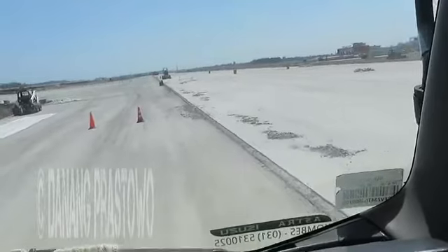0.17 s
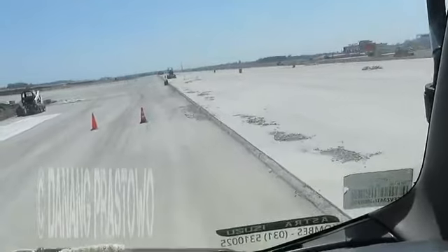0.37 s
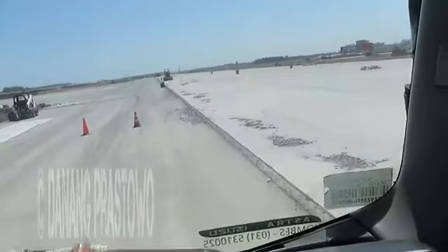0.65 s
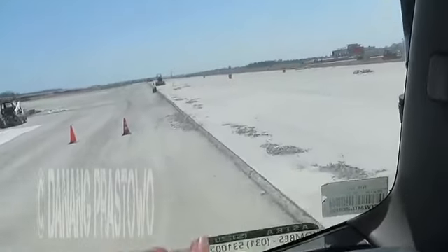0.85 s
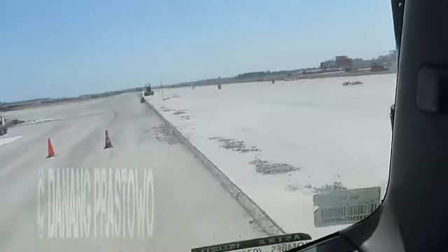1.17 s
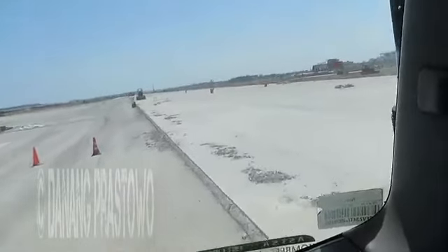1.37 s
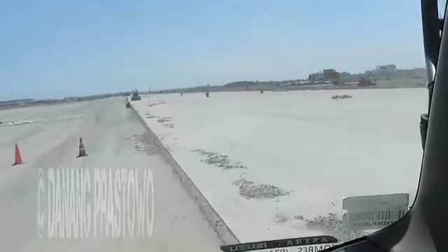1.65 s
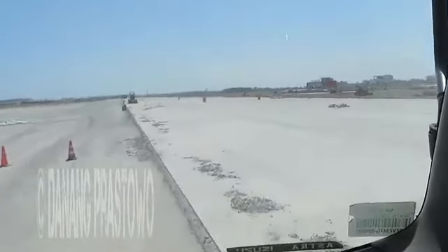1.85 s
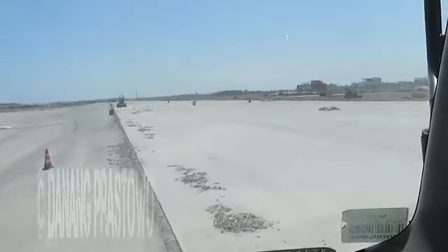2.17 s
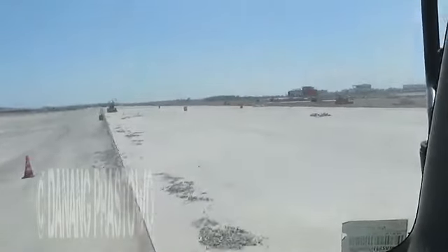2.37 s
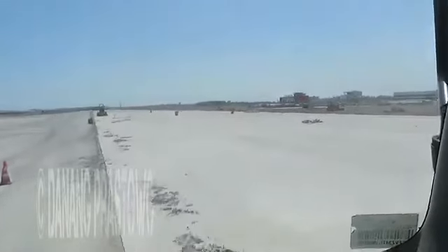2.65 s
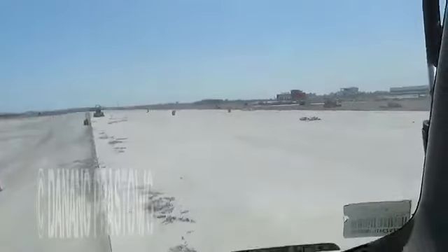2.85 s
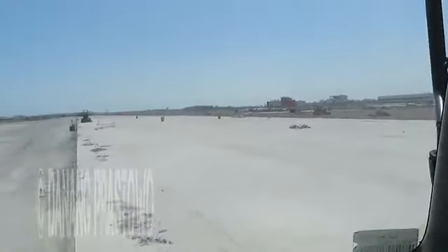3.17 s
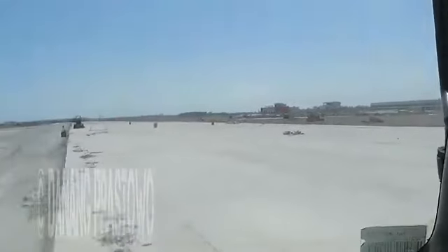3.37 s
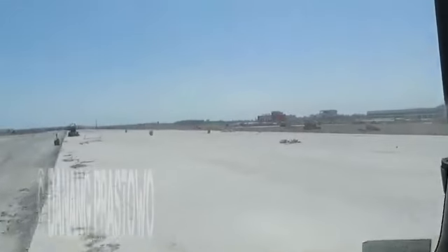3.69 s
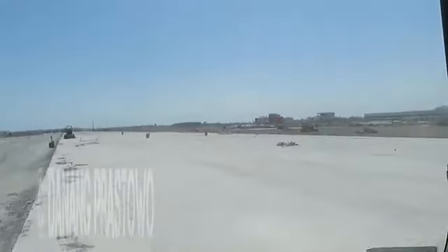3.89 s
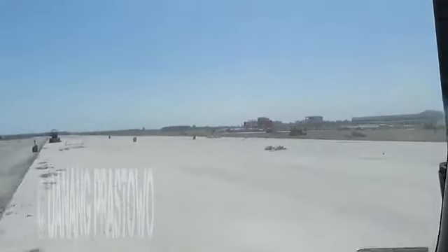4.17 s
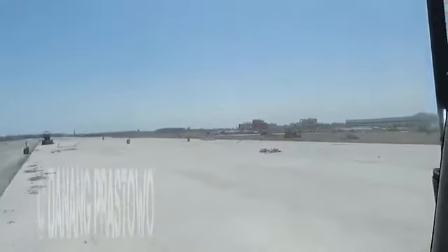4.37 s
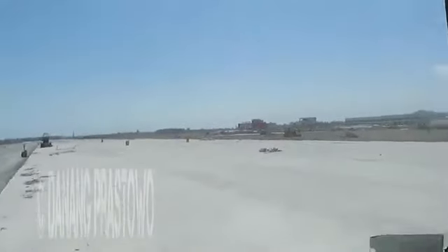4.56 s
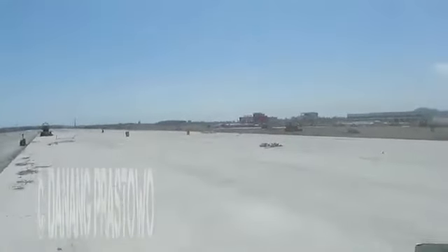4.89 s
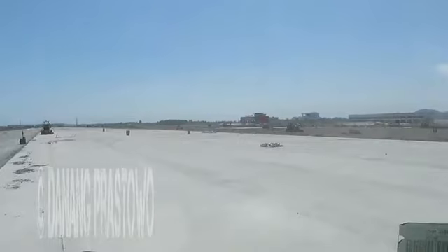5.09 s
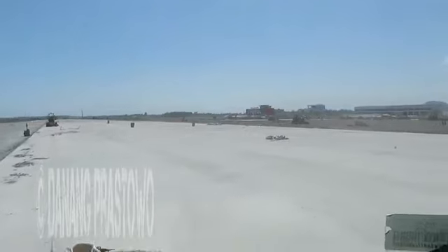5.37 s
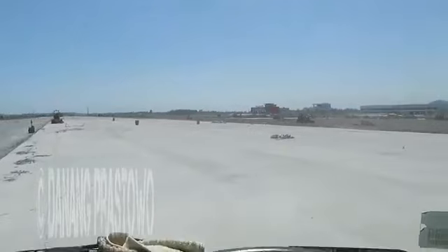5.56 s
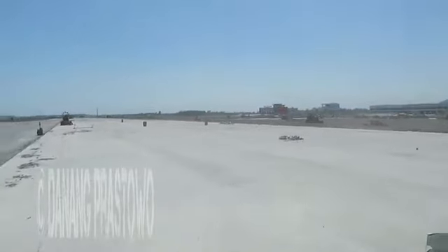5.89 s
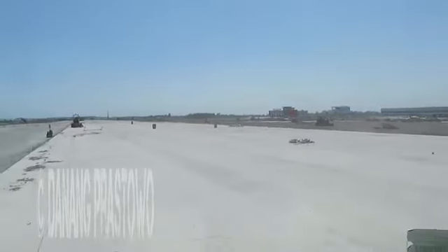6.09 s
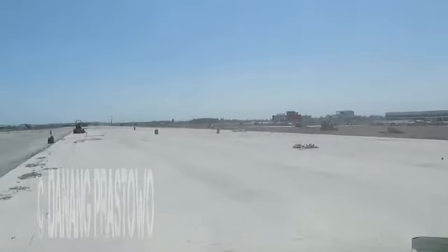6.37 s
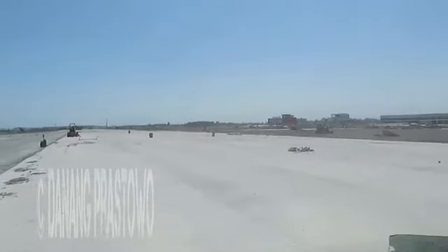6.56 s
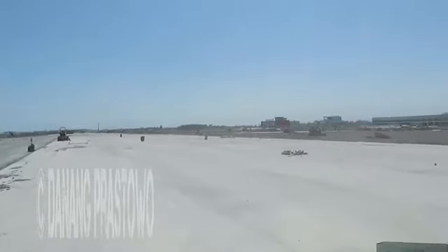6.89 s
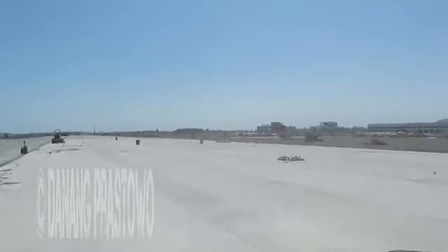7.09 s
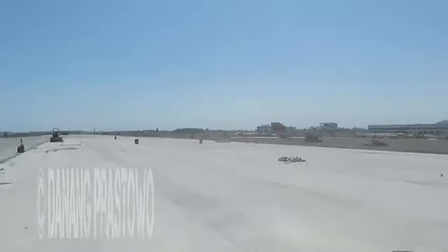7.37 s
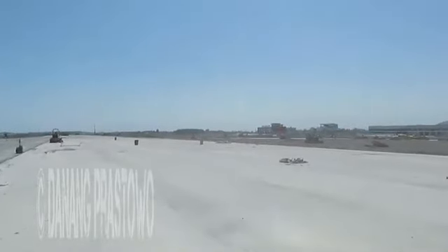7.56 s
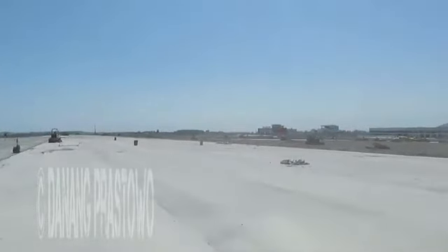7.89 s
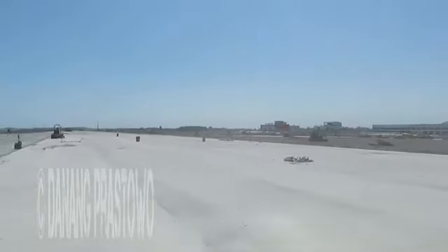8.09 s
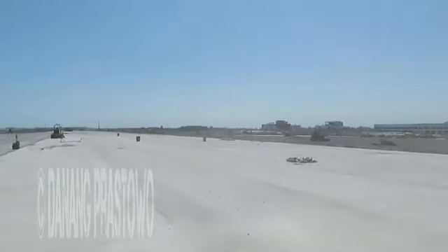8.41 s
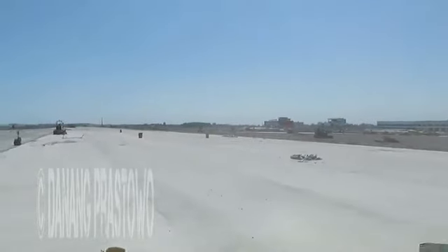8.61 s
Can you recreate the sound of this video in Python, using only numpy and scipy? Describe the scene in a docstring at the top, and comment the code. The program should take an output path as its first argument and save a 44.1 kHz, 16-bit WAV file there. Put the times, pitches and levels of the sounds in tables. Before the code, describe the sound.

Inside a heavy diesel truck cab crossing rough open ground: a deep engine boom with droning fan tones and dull road rumble. The engine slowly sags, then revs back up. Bumps thud in clusters around three, five and six to seven seconds, with sharp trim rattles and a tiny metal squeak. A handheld microphone in the cab thins the bass abruptly at times.

```python
"""Truck cab on rough ground

Inside the cab of a six-cylinder diesel truck: firing booms as summed orders, fan tones and shaft throb
follow the engine speed, and filtered noise gives rumble, cab drone, clatter and block knock.
Bumps drum floor panels and stir the clatter; taps ring loose trim modes and a small metal part squeaks.
A microphone wind filter thins the bass in sudden steps; the low mids are nearer mono meanwhile."""
import sys
import numpy as np
from scipy import signal
from scipy.fft import rfft, irfft, next_fast_len
from scipy.io import wavfile
from scipy.ndimage import uniform_filter1d

SR = 44100
rng = np.random.default_rng(int(sys.argv[2]) if len(sys.argv) > 2 else 0)


def output_pcm(signal):
    """Save a mono or channel-first signal as 16-bit PCM at the path in sys.argv[1].

    Samples are clipped to [-1, 1] before scaling.
    """
    pcm = np.clip(np.atleast_2d(signal).T, -1, 1) * 32767
    wavfile.write(sys.argv[1], SR, np.round(pcm).astype(np.int16))


N = 385434

# road rumble through the floor: (frequency [Hz], relative gain [dB])
RUMBLE_SPECTRUM = [(15, -21), (32, -8), (45, 3), (70, 1), (95, 4), (150, 3.5), (260, -1.5), (335, 1.5),
                   (400, 1.5), (470, -1), (560, -12), (700, -15), (1000, -56.5)]
# treble unshared by the two channels: (frequency [Hz], side to mid [dB])
TREBLE_SPREAD = [(900, -60.5), (1850, -16.5), (3270, -8.5), (5800, -5), (10200, -6)]


def from_db(db):
    """Amplitude ratio of a level in dB."""
    return 10 ** (np.asarray(db) / 20)


def rms_one(x):
    """Scales a signal to an rms of 1."""
    return x / np.sqrt(np.mean(x ** 2) + 1e-20)


def in_time(rows):
    """Interpolates each column of a (time, ...) table to every sample."""
    time_s, *columns = np.transpose(rows)
    return [np.interp(np.arange(N) / SR, time_s, column) for column in columns]


def drift(corner_hz):
    """Slow random signal of rms 1: noise through two equal poles, at a fortieth of the sample rate."""
    r = np.exp(-2 * np.pi * corner_hz * 40 / SR)
    noise = rng.standard_normal(N // 40 + 2002)
    slow = signal.lfilter([1], [1, -2 * r, r * r], noise)[2000:]   # settled part
    return np.interp(np.arange(N) / 40, np.arange(len(slow)), rms_one(slow))


def coloured(x, spectrum):
    """Applies a (frequency [Hz], gain [dB]) table, interpolated over log frequency."""
    size = next_fast_len(N)
    hz, db = np.transpose(spectrum)
    grid_hz = np.maximum(np.arange(size // 2 + 1) * SR / size, 1)
    gain = from_db(np.interp(np.log(grid_hz), np.log(hz), db))
    return irfft(rfft(x, size) * gain, size)[:N]


def ring(drive, hz, t60_s):
    """Two-pole resonator: a unit click starts a decaying sine of height 1."""
    r, w = from_db(-60 / (t60_s * SR)), 2 * np.pi * hz / SR
    return signal.lfilter([0, np.sin(w)], [1, -2 * r * np.cos(w), r * r], drive)


def add(out, start_s, sound):
    """Mixes a sound into out from its start time."""
    at = round(start_s * SR)
    out[at:at + len(sound)] += sound[:N - at]


def engine_turns():
    """Running count of firings: the tabled speed, wavering as the wheels roll over uneven ground."""
    # engine speed sags, then picks up: (time [s], firing rate before wobble [1/s])
    firing_rate = [(0.0, 54.1), (1.2, 52.9), (2.0, 51.7), (2.8, 50.3), (3.2, 49.0), (4.0, 47.8),
                   (4.8, 47.7), (5.2, 46.2), (6.0, 47.8), (6.8, 51.9), (7.2, 52.7), (8.0, 53.4),
                   (8.3, 54.3), (8.74, 55.2)]
    wobble_rms_hz, wobble_corner_hz = .22, 3.0
    rate_hz = in_time(firing_rate)[0] + wobble_rms_hz * drift(wobble_corner_hz)
    return np.cumsum(rate_hz) / SR


def engine(turns):
    """Each firing is a sharp suck of pressure: orders in step, the higher ones wavering more."""
    # (multiple of the firing rate, level to the boom [dB])
    firing_orders = [(1, 1), (2, -10.5), (3, -15.5), (4, -23)]
    # (time [s], boom level [dB], extra in the second order [dB])
    boom = [(0, -31.5, 5), (.25, -23, 3), (1.4, -23, 4.5), (1.9, -24, 2), (2.5, -25.5, -23),
            (2.85, -22.5, -2), (3.6, -23, 2), (4.2, -23, 6), (4.8, -23.5, 5.5), (5.1, -19.5, -1),
            (5.8, -21, 4), (6.4, -19, -4.5), (6.75, -23, -3.5), (7.05, -20.5, 6), (7.8, -21.5, 1),
            (8.1, -18, -1), (8.55, -18, 2.5), (8.74, -19, 3.5)]
    boom_db, second_db = in_time(boom)
    out = 0
    for k, db in firing_orders:
        waver_db, wander_rad = .6 * k * drift(5), .07 * k * drift(3.5)
        order_db = db + second_db * (k == 2) + waver_db
        out = out - from_db(order_db) * np.cos(2 * np.pi * k * turns + wander_rad)
    return np.sqrt(2) * from_db(boom_db) * out


def fan(turns):
    """Unevenly spaced blades of the belt-driven fan give unsteady tones on multiples of its speed."""
    fan_turns = .448 * turns   # fan turns per firing
    # (multiple of fan speed, level [dB])
    fan_orders = [(5, -39), (6, -43), (7, -33), (8, -42), (10, -37), (12, -42), (14, -38.5), (16, -40),
                  (18, -44)]
    # (time [s], gain of all fan tones [dB])
    fan_gain = [(0, 1), (2, 0.5), (3.2, 0.5), (4.5, 0), (5.5, -2.5), (7, -0.5), (8, -3.5), (8.74, -5)]
    # cab resonances lift a tone sliding onto them: (frequency [Hz], gain [dB])
    cab_response = [(105, -10), (120, 3), (128, -5), (143, 0), (158, -0.5), (170, -4), (210, -11),
                    (228, -2), (243, 3.5), (295, -11), (322, 2.5), (340, -1.5), (372, 2), (390, -5.5)]
    fan_hz = np.gradient(fan_turns) * SR
    tones = 0
    for k, db in fan_orders:
        lift_db = np.interp(k * fan_hz, *np.transpose(cab_response))
        unsteady_db, wander_rad = 2.5 * drift(1.5), .05 * k * drift(2)
        tone = np.sin(2 * np.pi * k * fan_turns + wander_rad)
        tones = tones + from_db(db + lift_db + unsteady_db) * tone
    return np.sqrt(2) * from_db(in_time(fan_gain)[0]) * tones


def shake(turns, shaft_db, rocking_db):
    """An unbalanced driveline shaft throbs below the firing; the road rocks the cab on its mounts."""
    shaft_ratio = .705   # shaft turns per firing
    mount_hz, mount_width_hz = 28.1, 21   # width of each of two resonator passes
    phase = 2 * np.pi * shaft_ratio * turns + .25 * drift(2.5)
    shaft = np.sqrt(2) * from_db(shaft_db + 1.5 * drift(3)) * np.sin(phase)
    r, w = np.exp(-np.pi * mount_width_hz / SR), 2 * np.pi * mount_hz / SR
    rocking = rng.standard_normal(N)
    for _ in range(2):
        rocking = signal.lfilter([1, 0, -1], [1, -2 * r * np.cos(w), r * r], rocking)
    return shaft + from_db(rocking_db) * rms_one(rocking)


def road_rumble(rumble_db):
    """Road noise through the floor: coloured noise with a slow and a faster random level."""
    uneven_db = 1.0 * drift(2.5) + 1.96 * drift(12.7)
    noise = from_db(uneven_db) * rng.standard_normal(N)
    return from_db(rumble_db) * rms_one(coloured(noise, RUMBLE_SPECTRUM))


def cab_drone(drone_db):
    """Noise rings an air mode of the cab, driven by the road, and a higher, steady one."""
    drone_hz, drone_t60_s = 160, 0.054
    hum_hz, hum_db, hum_t60_s = 327, -36, 0.1
    drone = rms_one(ring(rng.standard_normal(N), drone_hz, drone_t60_s))
    hum = rms_one(ring(rng.standard_normal(N), hum_hz, hum_t60_s))
    return from_db(drone_db) * drone + from_db(hum_db) * hum


def clatter(level):
    """Dense valve and combustion clatter and tyre hiss, flickering a little octave by octave."""
    # through the bulkhead: (frequency [Hz], relative gain [dB])
    hiss_spectrum = [(400, -1.5), (600, -4.5), (660, -4), (750, 2), (1100, 1.5), (1500, -4.5), (2000, -9.5),
                     (2800, -14), (3600, -19.5), (4300, -20.5), (5300, -26), (6200, -29), (7100, -32),
                     (7450, -30), (7800, -34), (8200, -31), (8500, -35), (10700, -44)]
    white = rng.standard_normal((2, 2, N))   # neighbouring bands get unrelated noise
    together = drift(3.2)
    edges_hz = 350 * 2. ** np.arange(7).clip(0, 5.8)
    bands = 0
    for k, (low_hz, high_hz) in enumerate(zip(edges_hz, edges_hz[1:])):
        flicker_db = .45 * together + .6 * drift(12)
        band_pass = signal.butter(2, [low_hz, high_hz], "band", fs=SR, output="sos")
        bands = bands + from_db(flicker_db) * signal.sosfilt(band_pass, white[k % 2])
    mid = coloured(bands[0], hiss_spectrum)
    side = coloured(coloured(bands[1], hiss_spectrum), TREBLE_SPREAD)
    return level * np.array([mid + side, mid - side]) / np.std(mid)


def knock(turns):
    """One knock per firing, its strength set by the cylinder, drawn out by the many modes of the block."""
    # the two halves of the block knock unequally: (level [dB]) per cylinder in firing order
    cylinder_db = [0, -7, -1, -6, 0, -8]
    # through the bulkhead: (frequency [Hz], relative gain [dB])
    knock_spectrum = [(500, -26), (700, -2.5), (1050, 1.5), (1350, -5), (2200, -21.5), (4000, -40)]
    scatter_db, t60_s = 1.5, .09
    firing = np.floor(turns).astype(int)
    strength = from_db(np.array(cylinder_db)[firing % 6] + scatter_db * rng.standard_normal(N))
    blows = (np.diff(firing, prepend=0) > 0) * strength
    t = np.arange(round(t60_s * SR)) / SR
    block = from_db(-60 * t / t60_s) * rng.standard_normal(len(t))
    return rms_one(coloured(signal.fftconvolve(blows, block)[:N], knock_spectrum))


def burst(length_s):
    """Envelope of a jolt: quick rise, slower fall."""
    t = np.arange(round(4 * length_s * SR)) / (length_s * SR)
    return (1 - np.exp(-6.0 * t)) * np.exp(-2.0 * t)


def bumps():
    """Each bump drums a floor panel; the longer, higher-pitched ones stir up more clatter."""
    # wheels over a bump: (time [s], level [dB], envelope scale [s], floor panel [Hz])
    bump_list = [(.27, -25.5, 0.029, 436), (1.462, -25, 0.022, 376), (1.645, -17.5, .025, 363),
                 (2.125, -19.5, 0.017, 368), (2.694, -15.5, .025, 345), (2.753, -21.5, 0.025, 398),
                 (2.765, -24, 0.02, 554), (2.882, -20, 0.056, 160), (2.93, -27.5, .03, 503),
                 (2.966, -16, 0.03, 498), (2.97, -26, .025, 596), (3.005, -19.5, 0.055, 454),
                 (3.025, -24.5, .03, 562), (3.032, -17.5, 0.034, 324), (3.055, -16, .014, 350),
                 (3.111, -21, 0.031, 435), (4.6, -25, 0.048, 200), (4.826, -11.5, 0.041, 180),
                 (4.88, -17.5, 0.046, 160), (4.956, -20, 0.053, 461.5), (4.97, -12, .04, 160),
                 (5.013, -15, 0.019, 480), (5.02, -27.5, 0.023, 608), (5.072, -21, 0.026, 360),
                 (5.093, -19, 0.017, 450), (5.111, -16, 0.022, 474), (5.16, -34, 0.017, 452),
                 (6.151, -21.5, 0.053, 482), (6.205, -23, .015, 805), (6.215, -16, 0.04, 470),
                 (6.612, -18, .02, 348), (6.698, -17.5, 0.028, 355), (6.887, -12, 0.018, 398),
                 (6.934, -21, 0.016, 408), (7.104, -15.5, 0.014, 387), (7.188, -15.5, .018, 397),
                 (7.269, -24.5, 0.016, 338), (7.642, -20.5, .02, 382), (7.863, -19, 0.017, 326),
                 (8.351, -24, 0.059, 412), (8.603, -18.5, 0.028, 310)]
    drum_rough = .3   # random share of each phase step
    stir_s, stir_db = 0.046, -22.5
    drum, stir = np.zeros(N), np.zeros(N)
    for start_s, db, length_s, hz in bump_list:
        shape = burst(length_s)
        rough = 1 + drum_rough * rng.standard_normal(len(shape))
        phase = np.cumsum(2 * np.pi * hz / SR * rough)
        add(drum, start_s, np.sqrt(2) * from_db(db) * shape * np.sin(phase))
        stir_gain = from_db(db) * length_s / stir_s * (hz / 480) ** 2
        add(stir, start_s, stir_gain * burst(stir_s))
    return drum, from_db(stir_db + 2.5 * drift(60)) * stir


def trim_taps():
    """A tap rings the trim's modes near its favoured pitch; a broad noise crack comes with it."""
    # (time [s], ringing level [dB], favoured pitch [Hz], crack level [dB]), before the trim gain
    taps = [(2.762, -28, 800, -37), (2.773, -34, 1300, -39), (2.838, -32, 930, -44), (2.863, -32, 750, -42),
            (2.932, -32, 2400, -40), (2.972, -28, 1300, -35), (2.98, -32, 2500, -39.5),
            (2.99, -28, 1110, -38), (3.0, -34, 900, -37), (3.024, -27.5, 1160, -37), (3.041, -26, 900, -33),
            (3.047, -28, 1500, -26.5), (3.056, -17.5, 790, -30), (3.0585, -32.5, 3200, -27),
            (3.0612, -21, 1700, -29.5), (3.064, -25.5, 1110, -29), (3.066, -18.5, 1440, -24.5),
            (3.074, -31, 1400, -27), (3.486, -28, 1000, -39), (4.604, -18, 894, -34.5),
            (4.905, -33, 2300, -40), (4.954, -29, 1400, -33), (4.958, -37, 3100, -33),
            (4.963, -29, 2500, -39), (4.969, -29, 1400, -36), (4.976, -28, 1400, -39),
            (4.985, -29, 1010, -42), (5.01, -22.5, 900, -41), (5.025, -32, 2300, -40),
            (5.035, -33, 1520, -37), (5.039, -39, 3100, -41), (5.065, -32, 1100, -44),
            (5.085, -35, 2100, -43), (5.098, -30.5, 1490, -39), (5.108, -36, 2700, -39),
            (5.112, -26.5, 700, -42), (5.12, -33, 1000, -45), (5.148, -29, 750, -44),
            (5.175, -30.5, 800, -45), (5.246, -30.5, 750, -43), (5.312, -31, 1400, -42),
            (5.349, -31, 2020, -28), (5.352, -21, 1330, -32), (5.3523, -38, 4100, -39),
            (5.3529, -20, 1920, -25), (5.356, -25, 800, -39), (5.3589, -21, 1400, -26),
            (5.359, -35, 6200, -35), (5.3603, -29, 2160, -31), (6.13, -46, 1460, -32),
            (6.154, -33, 1400, -41), (6.163, -38, 3100, -44), (6.175, -30, 1000, -43),
            (6.189, -30, 1400, -33), (6.194, -30, 1900, -30), (6.2, -23, 716, -30),
            (6.2005, -18.5, 1600, -20.5), (6.202, -24, 2200, -31), (6.2013, -30, 5570, -27),
            (6.209, -25, 754, -31), (7.495, -24, 1140, -31)]
    # modes of the trim panel: (frequency [Hz], level [dB], t60 [s])
    trim_modes = [(693, -2.5, 0.046), (902, -6, 0.06), (1040, -7, 0.016), (1180, -8.5, .014),
                  (1343, -1.5, 0.019), (1470, -4, 0.023), (1600, -6, .012), (1690, -2, 0.016),
                  (1920, -11, 0.011), (2230, -3.5, 0.014), (2410, -17, 0.017), (2880, -13, 0.014),
                  (3100, -7.5, 0.023), (4070, -9, .015), (5300, -7, .015), (6300, -6, 0.013)]
    # (frequency [Hz], gain [dB])
    crack_spectrum = [(500, -1), (1000, 8), (2000, -2), (4000, -10.5), (7000, -20), (10800, -27)]
    reach_oct, scatter_db = .35, 2.0   # modes this far from the favoured pitch lose 6 dB
    tap_rise_s, crack_rise_s, crack_t60_s = 0.0011, 0.00049, 0.041
    ringing, cracks = np.zeros(N), np.zeros(N)
    t = np.arange(round(.15 * SR)) / SR
    click = 1. * (t == 0)
    modes = np.array([from_db(db) * ring(click, hz, t60_s) for hz, db, t60_s in trim_modes])
    soft = np.minimum(t / tap_rise_s, 1)
    for start_s, db, favoured_hz, crack_db in taps:
        apart = np.log2(np.array(trim_modes)[:, 0] / favoured_hz) / reach_oct
        chance_db = scatter_db * rng.standard_normal(len(trim_modes))
        add(ringing, start_s, soft * (from_db(db - 6 * apart ** 2 + chance_db) @ modes))
        crack = from_db(crack_db - 60 * t / crack_t60_s) * rng.laplace(0, .7, len(t))
        add(cracks, start_s, np.minimum(t / crack_rise_s, 1) * crack)
    return ringing + coloured(cracks, crack_spectrum)


def squeaks():
    """A small metal part squeaks: short swelling sines with a randomly wandering phase."""
    # (time [s], level before the trim gain [dB], pitch [Hz], length [s])
    pings = [(5.35, -49, 5300, 0.0088), (5.358, -50, 5020, 0.027), (6.128, -58, 5140, .03),
             (6.2, -48, 4960, 0.044), (6.282, -54, 5000, 0.045), (6.355, -59, 4900, 0.03),
             (6.372, -52, 4770, 0.055)]
    rough_rad = .08   # phase wander per sample
    out, t = np.zeros(N), np.arange(round(.15 * SR)) / SR
    for start_s, db, hz, length_s in pings:
        swell = from_db(db) * np.sin(np.pi * np.minimum(t / length_s, 1) ** .6)
        wander = rough_rad * np.cumsum(rng.standard_normal(len(t)))
        add(out, start_s, swell * np.sin(2 * np.pi * hz * t + wander))
    return out


def rattles():
    """Taps and squeaks in stereo: a lagged, treble-weighted copy is the channel difference."""
    trim_db, side_db, lag_s = 2.5, -1, .00003
    mid = from_db(trim_db) * (trim_taps() + squeaks())
    side = from_db(side_db) * coloured(np.roll(mid, round(lag_s * SR)), TREBLE_SPREAD)
    return np.array([mid - side, mid + side])


def wind_filter():
    """Deep bass gain in dB: drops at once, holds, then lets go in steps."""
    # (time [s], hold [s], step of letting go [s])
    wind_cuts = [(.632, .5, .5), (3.132, .5, .5), (5.132, 2, .25), (8.632, .5, .5)]
    # {step of letting go [s]: deep bass gain at each step [dB]}
    cut_db = {.5: [-14, -7], .25: [-14, -9, -6]}
    db, t = np.zeros(N), np.arange(N) / SR
    for start_s, hold_s, step_s in wind_cuts:
        # last step first: each earlier, deeper one overwrites its start
        for k, step_db in reversed(list(enumerate(cut_db[step_s]))):
            db[(t >= start_s) & (t < start_s + hold_s + k * step_s)] = step_db
    return uniform_filter1d(db, size=400)


def scene():
    """Sums the cab's sounds; clatter and rattles are stereo, the rest is central."""
    # ground under the wheels:
    # (time [s], shaft throb [dB], rocking [dB], road rumble [dB], drone [dB])
    ground = [(0, -32, -37, -25.5, -28), (.3, -30.5, -24, -26, -32.5), (1.9, -32.5, -31.5, -27, -29.5),
              (2.5, -36, -43.5, -25.5, -46.5), (2.95, -47.5, -27, -24.5, -29.5),
              (3.5, -33, -31, -26.5, -33), (4.1, -35, -45, -27, -34.5), (4.9, -40, -23.5, -25.5, -27.5),
              (5.4, -39, -27, -25, -32), (6.1, -42, -26, -24, -41.5), (7.2, -50, -39, -23.5, -41),
              (8.74, -38.5, -40.5, -22.5, -42)]
    # (time [s], clatter and tyre hiss [dB], knock of the firings [dB])
    clatter_levels = [(0.0, -39, -48.5), (1.2, -38, -44.5), (2.9, -38, -48.5), (3.35, -39.5, -50.5),
                      (4.7, -38.5, -53.5), (5.2, -38, -52), (7.45, -37.5, -48.5), (8.35, -38, -51.5),
                      (8.74, -37, -47)]
    shaft_db, rocking_db, rumble_db, drone_db = in_time(ground)
    hiss_db, knock_db = in_time(clatter_levels)
    turns = engine_turns()
    drum, stir = bumps()
    motor = engine(turns) + fan(turns) + shake(turns, shaft_db, rocking_db)
    low = motor + road_rumble(rumble_db) + cab_drone(drone_db) + drum
    top = clatter(from_db(hiss_db) + stir) + from_db(knock_db) * knock(turns)
    return low + top + rattles()


def record(dry):
    """Microphone: port difference in the low mids, stepped wind filter, steep top cut."""
    # the right port hears more of the low mids: (frequency [Hz], side to mid [dB])
    port_spectrum = [(50, -56), (100, -27), (160, -19), (226, -15), (322, -10), (450, -7), (495, -7),
                     (530, -24), (570, -60)]
    own_share, lag_s = 0.29, .0002   # unrelated noise relative to mid; lag of the difference
    # while the bass is thinned, the channel difference is quieter and high-passed
    quieter_db, high_pass_hz = -6.5, 300
    shelf_hz, cutoff_hz = 310, 10850
    setting_db = wind_filter()

    mid = dry.mean(axis=0)
    own = own_share * np.std(mid) * rms_one(coloured(rng.standard_normal(N), RUMBLE_SPECTRUM))
    lean = coloured(np.roll(mid, round(lag_s * SR)) + own, port_spectrum)
    high_pass = signal.butter(5, high_pass_hz, "high", fs=SR, output="sos")
    quieter = from_db(quieter_db) * signal.sosfiltfilt(high_pass, lean)
    thinning = np.clip(-setting_db / 6, 0, 1)
    lean = (1 - thinning) * lean + thinning * quieter
    ports = dry + lean * [[-1], [1]]

    bass = signal.sosfilt(signal.butter(1, shelf_hz, fs=SR, output="sos"), ports)
    thinned = ports - (1 - from_db(setting_db)) * bass
    top_cut = signal.ellip(14, .3, 60, cutoff_hz, fs=SR, output="sos")
    return signal.sosfilt(top_cut, thinned)


dry = scene()
out = record(dry)
output_pcm(out)
```